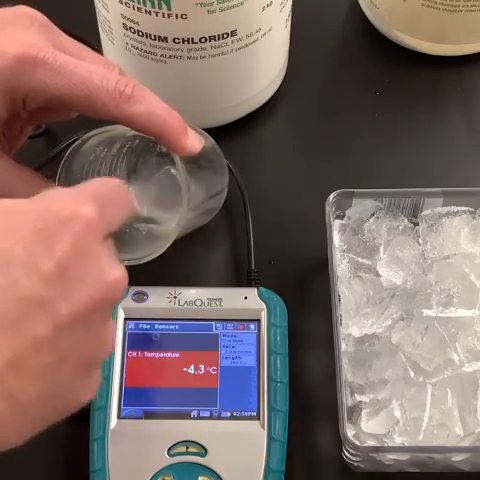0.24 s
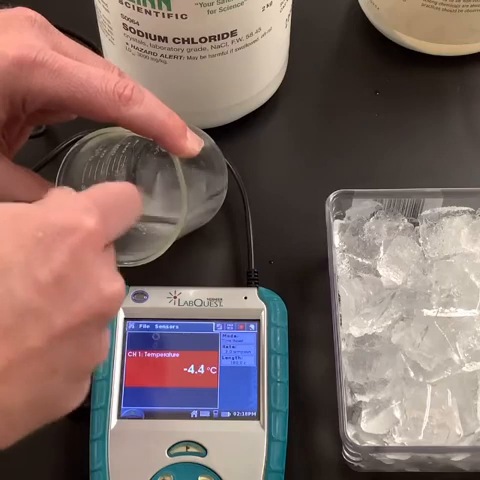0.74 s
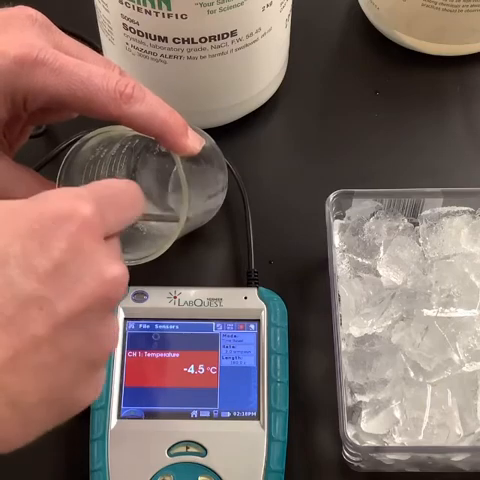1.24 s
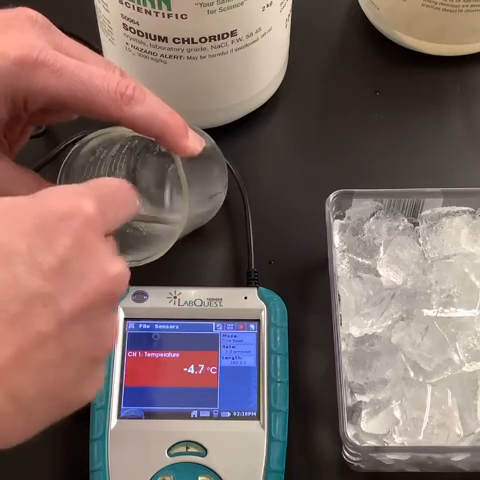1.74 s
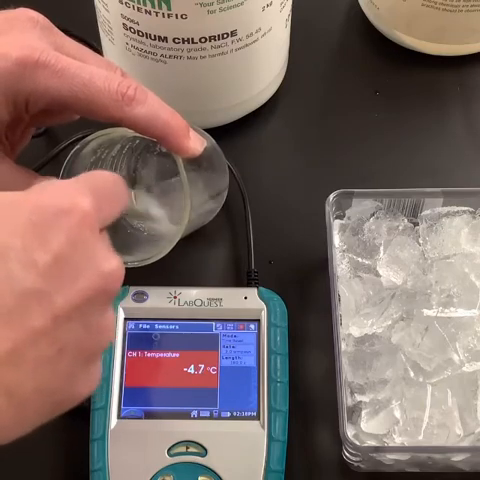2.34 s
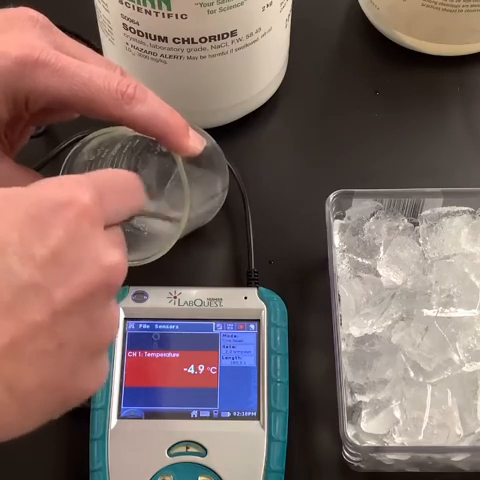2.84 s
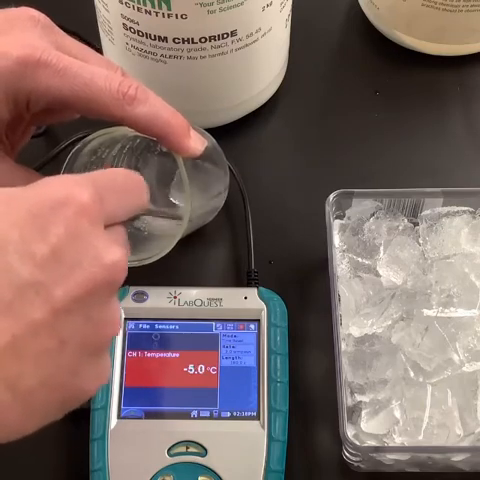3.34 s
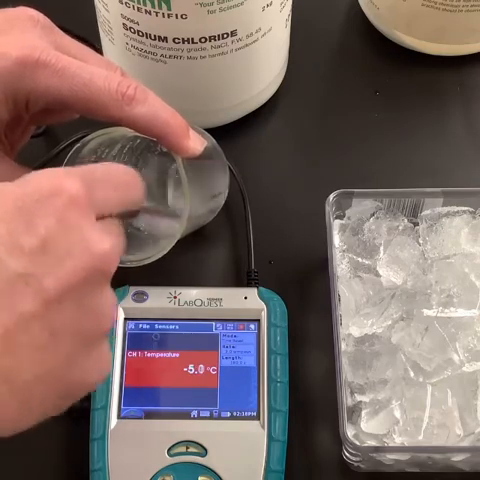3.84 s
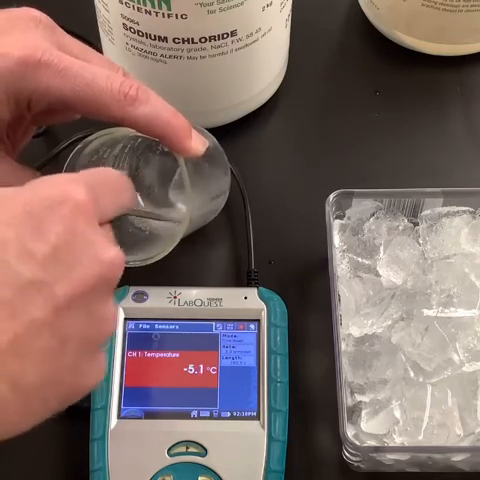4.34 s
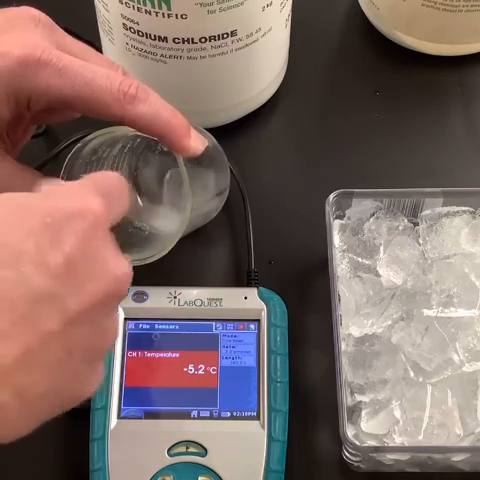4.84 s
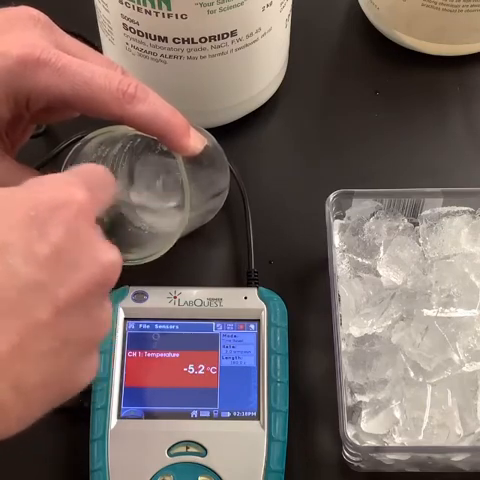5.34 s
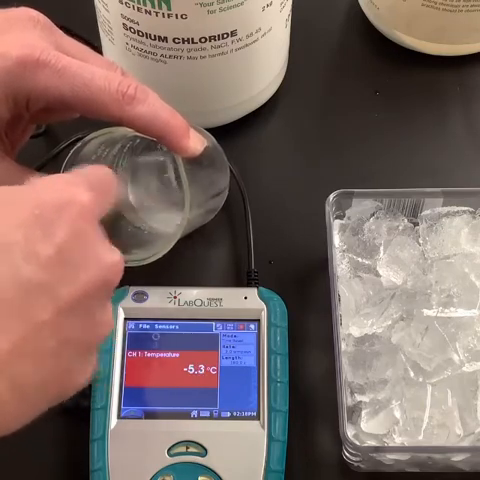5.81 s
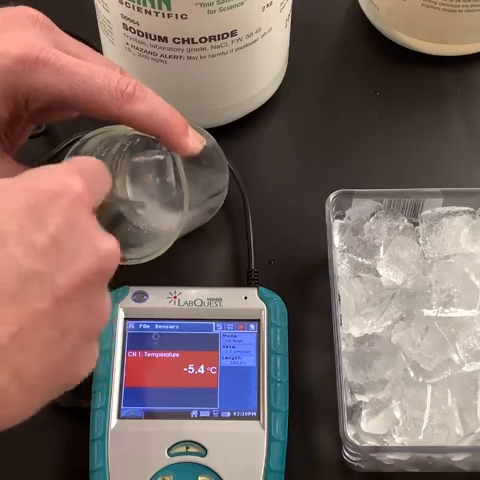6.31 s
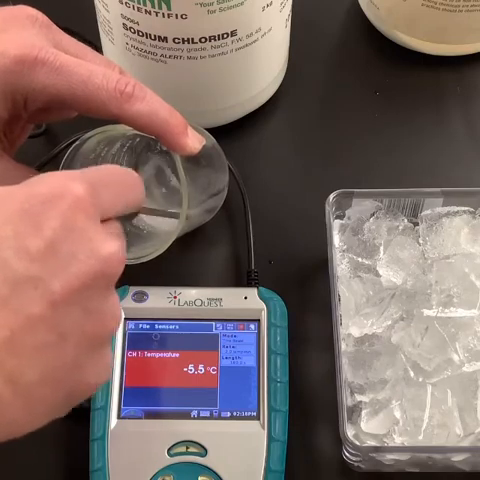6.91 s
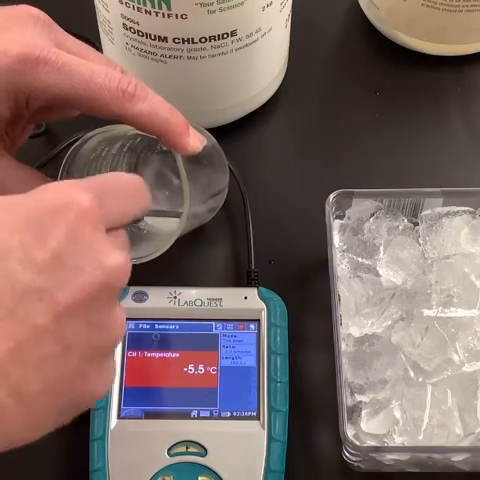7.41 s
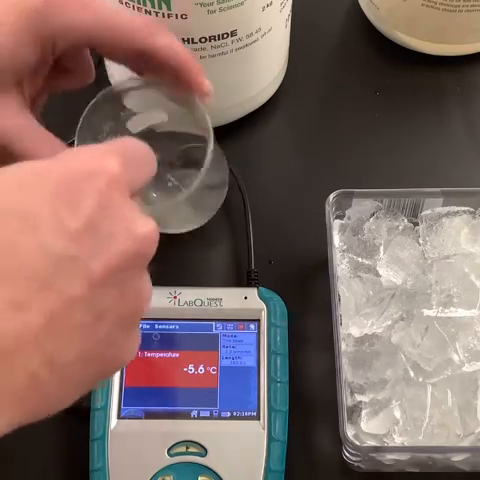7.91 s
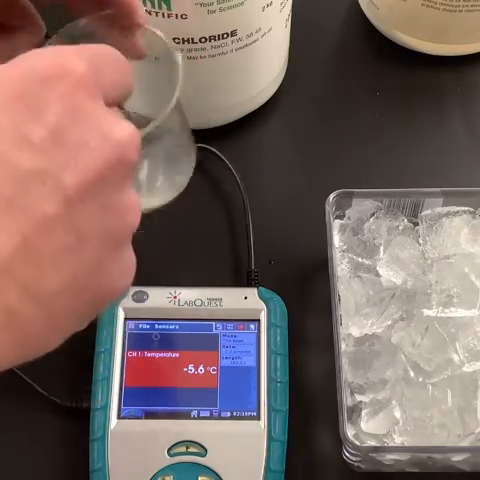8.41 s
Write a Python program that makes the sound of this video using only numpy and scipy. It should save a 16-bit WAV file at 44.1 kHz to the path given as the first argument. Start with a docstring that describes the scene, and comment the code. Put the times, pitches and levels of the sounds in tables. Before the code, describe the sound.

Close up on a lab bench, ice and salt are stirred briskly in a small glass beaker with a thin metal rod. The rod scratches along the wall and clinks unevenly, while the ice knocks softly and the meltwater sloshes a little. After almost eight seconds the stirring ends with a soft swish of fingers on glass and some final clinks, over a steady ventilation rumble.

```python
"""A lab bench, microphone close to a small hand-held glass beaker; ventilation rumbles throughout.
From the start a thin steel probe stirs salted ice, each stroke dragging it along the wall in tiny contacts.
Probe and ice clink on the glass, the probe rings at a pitch set by the grip, and bubbles pop in the melt.
Near 8 s the stirring stops: fingers slide on wet glass, the probe squeaks, and a few last clinks follow."""
import sys
import numpy as np
from scipy import signal
from scipy.fft import rfft, irfft
from scipy.io import wavfile
from scipy.ndimage import uniform_filter1d, map_coordinates

SR = 44100
rng = np.random.default_rng(int(sys.argv[2]) if len(sys.argv) > 2 else 0)


def put_to_file(sound):
    """Save the sound as 16-bit audio at rate SR, in the file named by the first command-line argument."""
    columns = np.atleast_2d(sound).T  # one column per channel
    safe = np.clip(columns, -1, 1)
    whole_steps = np.round(safe * 32767)
    wavfile.write(sys.argv[1], SR, whole_steps.astype(np.int16))


N = 381906

# beaker wall, damped by hand and ice: pitch_hz, gain_db, t60_s
WALL_MODES = [(7370, -8.5, 0.044), (8360, 2, 0.014), (9000, 2.5, 0.0093), (9255, 9, 0.012),
              (9810, 4.5, 0.012), (10680, -3, 0.015), (11400, -15.5, 0.02), (12900, -5, 0.011),
              (14700, -30, 0.0071), (16200, -18, 0.012)]
# rim of the beaker: pitch_hz, gain_db, t60_s
RIM_MODES = [(2350, -11, 0.008), (3170, -11, 0.055), (3450, -8, 0.012), (3920, -5, 0.01), (5700, -12, .008)]
# bowl of the beaker and its air, deepest first: pitch_hz, gain_db, t60_s
BOWL_MODES = [(470, -1.5, 0.011), (895, 2, 0.19), (928, 9, 0.092), (1044.4, 6, 0.032), (1234, -8, 0.052),
              (1514, 7, 0.01)]
# upper modes of the loosely held probe: pitch_hz, gain_db, t60_s
PROBE_MODES = [(8200, -6, .014), (11000, -13, .006), (13400, -14, .006)]
PROBE_T60_S, OVERTONE_T60_S = 0.022, 0.035
OVERTONE_RATIO = 1.95  # times the probe's pitch


def strokes(grit_gain, rub_gain, slosh_gain):
    """Salt, ice and probe drag along the glass; each kind of contact rings its own part."""
    # how freely the probe rings: time_s, gain_db
    freedom = [(0, 14.5), (.9, 3), (1.75, 0.5), (2.2, -1), (2.9, -10), (3.1, 6), (3.74, 11.5), (3.79, -25),
               (4.52, -6), (4.58, -1.5), (7.7, 6.5), (8.3, 3), (8.5, 20), (8.66, 13)]
    # ice piled low drives two deep bowl modes: time_s, gain_db
    low_ice = [(4.45, -21), (4.65, -7), (5.45, -2.5), (5.55, -24)]
    chips = grit_gain * contacts(per_s=300, uneven_db=3.2, clump_db=3)
    grit = chips + grit_gain * contacts(per_s=1200, uneven_db=3, clump_db=6.5)
    rub = rub_gain * contacts(per_s=700, uneven_db=3, clump_db=5.5)
    slosh = slosh_gain * contacts(per_s=1100, uneven_db=2, clump_db=3)
    overtone = probe_ring(grit * from_db(5 * drift(per_s=25)), OVERTONE_RATIO, OVERTONE_T60_S)
    wall = ice_load(body(grit, WALL_MODES, spread_db=4))
    treble = above(from_db(-33.5) * wall + from_db(-27) * overtone, 5700)
    free_rub = rub * from_db(in_time(freedom)[0])
    fundamental = probe_ring(free_rub, 1, PROBE_T60_S)
    sparkle = above(ice_load(body(free_rub, PROBE_MODES, spread_db=5.5)), 5300)
    rim = from_db(3.5) * body(rub, RIM_MODES, spread_db=3.5)
    scrape = above(fundamental + sparkle + rim, 1030)
    hollow = body(slosh * from_db(in_time(low_ice)[0]), BOWL_MODES[1:3], spread_db=6)
    bowl = hollow + body(slosh, BOWL_MODES[:1] + BOWL_MODES[3:], spread_db=3)
    return treble + from_db(-19) * scrape + from_db(-31.5) * above(bowl, 373)


def stroke_pressure():
    """Gains of grit, rubbing and sloshing over time: each stroke sets in fast and dies slower."""
    # strokes, one each way round the beaker: start_s, length_s, force_db
    stir = [(0.0, 0.017, -46.5), (0.099, 0.043, -39.5), (0.204, 0.072, -51), (0.336, 0.022, -35.5),
            (0.396, 0.13, -52.5), (0.575, 0.15, -53.5), (0.671, 0.055, -49.5), (0.813, 0.043, -41.5),
            (0.901, 0.054, -38), (1.021, 0.052, -43.5), (1.14, 0.062, -44), (1.273, 0.043, -35.5),
            (1.394, 0.05, -41), (1.505, 0.038, -34.5), (1.599, 0.039, -48), (1.652, 0.02, -39),
            (1.74, 0.03, -38), (1.83, 0.066, -48.5), (1.975, 0.04, -36.5), (2.089, 0.053, -47),
            (2.197, 0.068, -49.5), (2.331, 0.055, -44.5), (2.467, 0.027, -41.5), (2.555, 0.056, -43.5),
            (2.71, 0.014, -40.5), (2.787, 0.075, -48.5), (2.928, 0.016, -33), (3.005, 0.08, -44.5),
            (3.148, 0.051, -41), (3.269, 0.049, -46), (3.373, 0.052, -44), (3.506, 0.044, -42.5),
            (3.602, 0.11, -45), (3.75, 0.044, -39.5), (3.851, 0.042, -38), (3.967, 0.073, -42),
            (4.1, 0.034, -34), (4.208, 0.064, -45), (4.328, 0.047, -34.5), (4.435, 0.091, -46),
            (4.564, 0.047, -38.5), (4.682, 0.051, -44), (4.79, 0.056, -41.5), (4.903, 0.073, -48),
            (5.029, 0.064, -45), (5.127, 0.1, -48), (5.272, 0.036, -40.5), (5.397, 0.068, -42.5),
            (5.544, 0.13, -54.5), (5.672, 0.022, -34.5), (5.77, 0.048, -49.5), (5.874, 0.077, -45.5),
            (5.991, 0.055, -51), (6.119, 0.068, -43.5), (6.24, 0.046, -50.5), (6.361, 0.048, -39.5),
            (6.464, 0.069, -52.5), (6.62, 0.042, -38), (6.72, 0.046, -50), (6.839, 0.069, -43.5),
            (6.964, 0.052, -48.5), (7.079, 0.048, -41.5), (7.202, 0.038, -49.5), (7.301, 0.099, -45),
            (7.443, 0.039, -54), (7.563, 0.056, -41.5), (7.74, 0.02, -50), (8.292, 0.16, -68),
            (8.589, 0.0091, -35.5)]
    # what a stroke of the usual force stirs up: time_s, grit_db, rub_db, slosh_db
    usual_mix = [(0, -64, -61, -44.5), (.72, -81, -54.5, -50.5), (.8, -49, -59, -46),
                 (1.2, -43.5, -56.5, -50.5), (2.5, -44.5, -56, -47), (4.5, -42, -54.5, -50.5),
                 (7.5, -45, -56.5, -48), (7.8, -45.5, -57.5, -65.5), (8.6, -43, -62, -52.5)]
    # growth with force: grit_db_per_db, rub_db_per_db, slosh_db_per_db
    force_slopes = [0.69, 0.89, 0.48]
    # the ice never quite rests between strokes: grit_db, rub_db, slosh_db
    restless_db = [
        [-8],
        [-10],
        [-0.5],
    ]
    usual_force_db, rise_s, fall_s = -44, 0.0038, 0.01
    pushes, usual_db = np.zeros((3, N)), np.array(in_time(usual_mix))
    for start_s, length_s, force_db in stir:
        start, end = round(start_s * SR), round((start_s + length_s) * SR)
        levels_db = usual_db[:, start] + np.multiply(force_slopes, force_db - usual_force_db)
        pushes[:, start:end] += from_db(levels_db)[:, None]
    attack = lag(pushes, rise_s)
    restless = from_db(restless_db) * uniform_filter1d(pushes, SR // 6, axis=1)
    return np.maximum(attack, lag(attack, fall_s)) + restless


def contacts(per_s, uneven_db, clump_db):
    """Random tiny contacts, mostly small, bunched into short crunches; rms 1."""
    sizes = from_db(uneven_db * np.minimum(rng.exponential(1, N), 4.5)) * rng.choice([-1, 1], N)
    clumps = from_db(clump_db * drift(per_s=130))
    return rms_one(sizes * clumps * (rng.random(N) < per_s / SR))


def clinks():
    """Each clink is a very short rattle that rings wall, probe and rim."""
    # probe and ice hit the glass: start_s, strength_db, probe_offset_db
    hits = [(0.076, -57, 22), (.283, -46, -2), (0.401, -39.5, 16.5), (0.516, -43, 8), (0.578, -35, 3),
            (0.62, -49, 22.5), (.788, -41, -20), (0.8184, -20.5, -22), (.838, -30, 2), (0.867, -34, -4),
            (0.879, -26, -15), (0.951, -19.5, -15), (0.988, -25.5, -2.5), (1.02, -15, -42),
            (1.067, -25.5, -7.5), (1.264, -35, -6), (1.282, -20.5, -3), (1.293, -39, 13.5),
            (1.314, -36.5, 12.5), (1.394, -31, 2.5), (1.414, -33, -1), (1.432, -30, -28),
            (1.4464, -24, -36), (1.51, -16.5, -34), (1.594, -43.5, 15), (1.7332, -30, -10.5),
            (1.971, -29.5, -21), (2.0149, -21.5, -10.5), (2.2303, -17, -10.5), (2.2357, -21.5, -25),
            (2.4741, -23, -12), (2.926, -20.5, -19.5), (3.0777, -24, -25), (3.101, -55.5, 17.5),
            (3.164, -27.5, 2), (3.387, -33.5, -12), (3.445, -42.5, 11), (3.606, -27.5, -3),
            (3.86, -40, -25), (3.972, -33, -36), (4.01, -22, -40), (4.105, -47, -19), (4.2214, -28.5, -37),
            (4.269, -30, -30), (4.339, -31, -8), (4.512, -23, -43), (4.562, -20.5, -18), (4.586, -27, -3.5),
            (4.614, -24, -8.5), (4.7247, -30, -26), (4.8025, -32.5, -0.5), (5.042, -20, -17),
            (5.111, -35, -24), (5.2895, -25, -31), (5.398, -33, -23), (5.659, -30.5, -16), (5.692, -32, -1),
            (5.903, -27.5, -23), (6.1395, -23, -26), (6.662, -29, -1.5), (6.895, -40, 3), (7.104, -34, -14),
            (7.227, -27, -28), (7.491, -35, -20), (7.61, -34, -12), (7.7932, -37, -36),
            (7.9032, -20.5, -21), (8.521, -44.5, -1.5), (8.5436, -12.5, -27), (8.5938, -20.5, -30)]
    start_s, strength_db, probe_offset_db = np.transpose(hits)
    rattle_s = 0.0042
    envelope = np.sin(np.linspace(0, 1, round(rattle_s * SR)) ** 0.65 * np.pi)
    rattles = envelope * rng.standard_normal((len(hits), SR // 50))[:, :len(envelope)]
    rattles /= np.linalg.norm(rattles, axis=1, keepdims=True)
    at = np.round(start_s * SR).astype(int)[:, None] + np.arange(len(envelope))
    glass, steel = np.zeros(N), np.zeros(N)
    glass[at] = from_db(strength_db - 12.5)[:, None] * rattles
    steel[at[:, 8]] = from_db(strength_db + probe_offset_db + 4)  # one click early in each rattle
    fundamental = from_db(-4) * above(probe_ring(steel, 1, PROBE_T60_S), 3700)
    rim = body(from_db(-19) * steel + from_db(-20) * glass, RIM_MODES, spread_db=2)
    wall = from_db(2) * body(glass, WALL_MODES, spread_db=4)
    overtone = probe_ring(glass, OVERTONE_RATIO, OVERTONE_T60_S)
    sparkle = body(from_db(-18) * steel, PROBE_MODES, spread_db=2)
    treble = above(wall + overtone + sparkle, 6200)
    return above(treble, 5200) + above(fundamental + rim, 1500)


def probe_ring(clicks, ratio, t60_s):
    """A mode of the steel probe: a decay in a frame that turns at ratio times the probe's pitch."""
    turn = np.exp(2j * np.pi * np.cumsum(ratio * probe_hz()) / SR)
    decay = from_db(-60 / (t60_s * SR))
    return (signal.lfilter([1], [1, -decay], clicks / turn + 1e-18) * turn).imag


def probe_hz():
    """The probe's pitch follows the grip, wavers, and arches with each bend against the glass."""
    # resting pitch set by the grip: time_s, pitch_hz
    grip = [(0, 4400), (.9, 4330), (1.27, 4600), (1.75, 4600), (2.17, 4400), (2.9, 4350), (3.1, 4530),
            (3.74, 4620), (3.79, 5050), (4.52, 5050), (4.58, 4770), (6, 4730), (7.7, 4640), (8.3, 4350),
            (8.66, 4330)]
    # bends of the probe: middle_s, length_s, shift_hz
    bends = [(1.32, 0.073, 550), (1.58, 0.22, 397), (1.793, 0.17, 307), (3.225, 0.12, 544),
             (3.46, 0.14, 455), (3.674, 0.14, 463.5), (8.385, 0.14, -330), (8.547, 0.063, -400)]
    flutter_hz, wander_hz = 30, 45
    t = np.arange(N) / SR
    waver = flutter_hz * drift(per_s=73) + wander_hz * drift(per_s=12)
    arches = sum(shift_hz * np.sqrt(np.clip(1 - (2 * (t - middle_s) / length_s) ** 2, 0, 1))
                 for middle_s, length_s, shift_hz in bends)
    return in_time(grip)[0] + waver + arches


def body(clicks, modes, spread_db):
    """Each mode is struck with a strength that changes as the point of contact moves."""
    out = np.zeros(N)
    for hz, gain_db, t60_s in modes:
        contact_db = spread_db * (drift(per_s=70) + 0.7 * drift(per_s=8))
        out += ring(clicks * from_db(gain_db + contact_db), hz, t60_s)
    return out


def ice_load(x, shift_s=0.0022):
    """Pressing ice retunes all modes together by a few percent, through a wandering time shift."""
    return map_coordinates(x, [np.arange(N) + shift_s * SR * drift(per_s=9)], order=3)


def knocks():
    """A lump of ice knocks the bottom; the soft blow rings the deepest bowl modes."""
    # blows of the ice: start_s, strength_db
    lumps = [(1.172, -44), (2.094, -39.5), (2.56, -37.5), (3.022, -38), (4.13, -37), (5.053, -37),
             (6.143, -37), (6.617, -45.5), (6.77, -41)]
    start_s, strength_db = np.transpose(lumps)
    blows = np.zeros(N)
    blows[np.round(start_s * SR).astype(int)] = from_db(strength_db - 6.5)
    return above(body(lag(blows, 0.00015), BOWL_MODES[:3], spread_db=2), 330)


def taps(t60_s=0.018):
    """A small chip of ice taps the glass and sounds its own short damped note."""
    # ice chips: start_s, level_db, pitch_hz
    chips = [(2.264, -39, 2340), (3.387, -43, 2470), (6.895, -36, 3420), (7.749, -48, 1600),
             (7.77, -48, 1600), (7.855, -60, 1500), (7.9034, -38, 2320), (8.499, -50, 1300)]
    out, t = np.zeros(N + SR), np.arange(SR // 20) / SR
    for start_s, level_db, hz in chips:
        start = round(start_s * SR)
        envelope = from_db(level_db - 60 * t / t60_s) * np.minimum(t * hz, 1)
        out[start:start + len(t)] += envelope * np.sin(2 * np.pi * hz * t)
    return out[:N]


def bubbles(slosh_gain):
    """A bubble's pitch glides ever faster to its end; small ones pop louder as the melt sloshes."""
    # distinct bubbles and drops: start_s, level_db, start_hz, end_hz
    distinct = [(0.519, -45, 1480, 3600), (4.485, -47, 1750, 2520), (4.555, -37.5, 3680, 3170),
                (5.925, -43, 1550, 3000), (6.16, -43.5, 1490, 3970), (6.36, -44.5, 3970, 3180),
                (6.405, -41.5, 1440, 3850), (6.63, -38, 4100, 3170), (7.357, -43, 3900, 3400)]
    rising_s, falling_s, small_s, small_climb_ratio = 0.0116, 0.0096, 0.0075, 1.44
    pops = [(start_s, level_db, start_hz, end_hz, rising_s if end_hz > start_hz else falling_s)
            for start_s, level_db, start_hz, end_hz in distinct]
    for when, loudness, pitch in rng.random((170, 3)):  # the small bubbles
        at = int(when * N)
        level_db = 20 * np.log10(slosh_gain[at] + 1e-9) + 8 * loudness - 13
        hz = 1600 * 2.4 ** pitch
        pops.append((at / SR, level_db, hz, small_climb_ratio * hz, small_s))
    out = np.zeros(N + SR)
    for start_s, level_db, start_hz, end_hz, length_s in pops:
        start = round(start_s * SR)
        progress = np.linspace(0, 1, round(length_s * SR))
        glide_hz = start_hz * (end_hz / start_hz) ** progress ** 1.52
        pop = np.sin(np.pi * progress) * np.sin(2 * np.pi * np.cumsum(glide_hz) / SR)
        out[start:start + len(pop)] += from_db(level_db) * pop
    return out[:N]


def fingers():
    """Skin on wet glass gives a smooth broad swish; steady drag makes the probe sing."""
    # fingers, then probe, slide along the glass: time_s, swish_db, squeak_db
    slide = [(7.9, -110, -110), (7.95, -63.5, -110), (8.2, -58.5, -100), (8.33, -66, -66), (8.47, -89, -64),
             (8.55, -79, -79), (8.66, -82, -74)]
    swish_db, squeak_db = in_time(slide)
    skin, drag = rng.standard_normal((2, N))
    swish = above(ring(skin, hz=9260, t60_s=0.0016) + from_db(-22) * skin, 1200)
    low_squeak = rms_one(probe_ring(drag, ratio=1, t60_s=0.08))
    high_squeak = rms_one(ring(drag * from_db(10 * drift(per_s=60)), hz=8300, t60_s=0.02))
    return from_db(swish_db) * rms_one(swish) + from_db(squeak_db) * (low_squeak + high_squeak)


def room(x, t60_s=0.18, onset_s=0.0019):
    """Bench and walls answer with a short dying wash."""
    t = np.arange(SR // 2) / SR
    wash = rng.standard_normal(len(t)) * from_db(-60 * t / t60_s) * np.minimum(t / onset_s, 1)
    return signal.fftconvolve(x, wash / np.sqrt(np.sum(wash ** 2)))[:N]


def room_tone():
    """Steady ventilation rumble under a faint hiss."""
    # ventilation: frequency_hz, relative_density_db
    rumble = [(28, -5), (45, -8.5), (98, 0), (115, -5), (133, 4.5), (147, 1.5), (162, 6), (180, -4),
              (195, 0), (245, -14.5), (276, -15), (370, -21.5), (600, -45)]
    # room and microphone hiss: frequency_hz, relative_density_db
    hiss = [(250, -33), (420, 12.5), (1420, -3.5), (2140, -11), (3140, -27), (4450, -24), (6000, -39),
            (9110, -14), (16000, -24)]
    return from_db(-46) * coloured(rumble) + from_db(-68) * coloured(hiss)


def coloured(spectrum):
    """Steady noise with the given spectrum; rms 1."""
    hz, level_db = np.transpose(spectrum)
    grid_hz = np.arange(N // 2 + 1) * SR / N + 1
    shape = from_db(np.interp(np.log(grid_hz), np.log(hz), level_db))
    return rms_one(irfft(rfft(rng.standard_normal(N)) * shape, N))


def ring(clicks, hz, t60_s):
    """A unit click sets a sine of height 1 ringing."""
    decay, step = from_db(-60 / (t60_s * SR)), 2 * np.pi * hz / SR
    return signal.lfilter([0, np.sin(step)], [1, -2 * decay * np.cos(step), decay ** 2], clicks + 1e-18)


def above(x, hz):
    """Steep high-pass: a thin wall hardly radiates below its modes."""
    return signal.sosfilt(signal.butter(4, hz, "high", fs=SR, output="sos"), x)


def lag(x, seconds):
    """One-pole smoothing."""
    decay = np.exp(-1 / (seconds * SR))
    return signal.lfilter([1 - decay], [1, -decay], x)


def drift(per_s):
    """A random curve through per_s points a second, each of spread 1."""
    knots = rng.standard_normal(int(per_s * N / SR) + 2)
    return np.interp(np.arange(N) * per_s / SR, np.arange(len(knots)), knots)


def in_time(rows):
    """Columns of a curve table at every sample."""
    time_s, *columns = np.transpose(rows)
    return [np.interp(np.arange(N) / SR, time_s, column) for column in columns]


def from_db(db):
    """Decibels to gain."""
    return 10 ** (np.asarray(db) / 20)


def rms_one(x):
    """Scale to rms 1."""
    return x / np.sqrt(np.mean(x ** 2) + 1e-20)


def scene():
    """Beaker close to one microphone, room tone behind."""
    grit, rub, slosh = stroke_pressure()
    beaker = strokes(grit, rub, slosh) + clinks() + knocks() + taps() + bubbles(slosh) + fingers()
    return (beaker + room_tone() + from_db(-11.5) * room(beaker))[None]


def record(dry):
    """The microphone drops the lowest bass; the top is cut above about 16 kHz."""
    top_cut = signal.cheby2(14, 70, 16700, fs=SR, output="sos")
    return signal.sosfilt(top_cut, above(dry, hz=36))


dry = scene()
out = record(dry)
put_to_file(out)
```